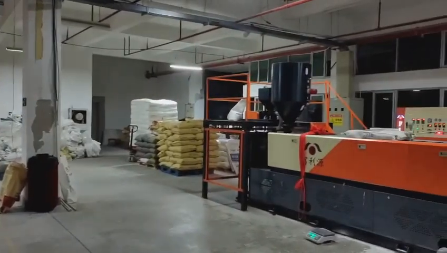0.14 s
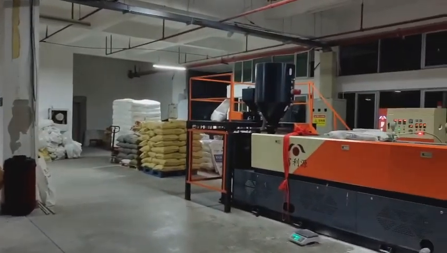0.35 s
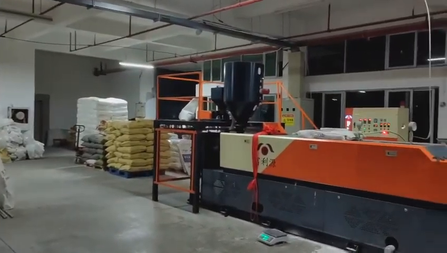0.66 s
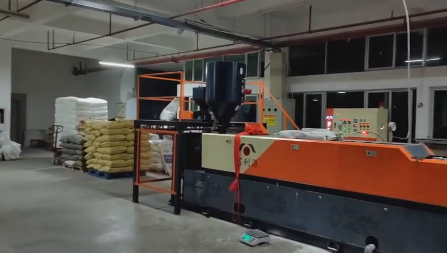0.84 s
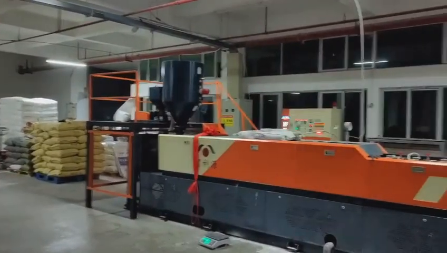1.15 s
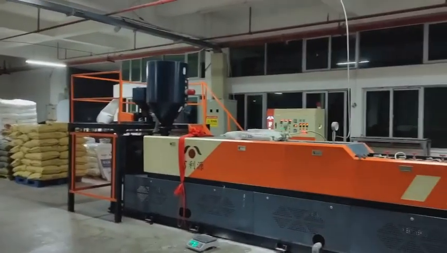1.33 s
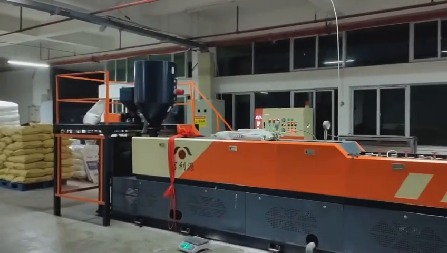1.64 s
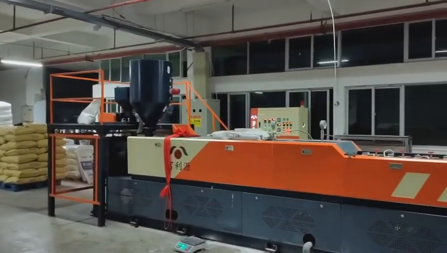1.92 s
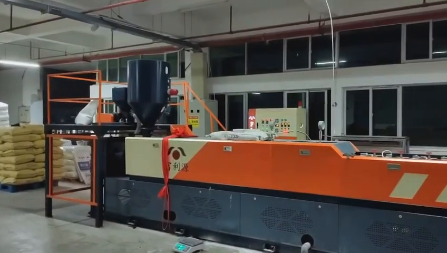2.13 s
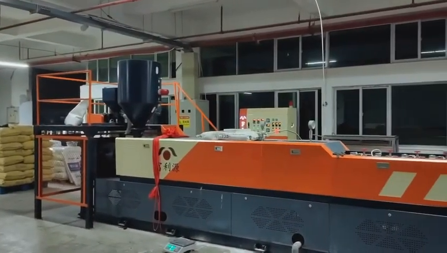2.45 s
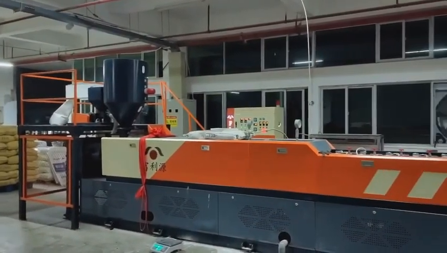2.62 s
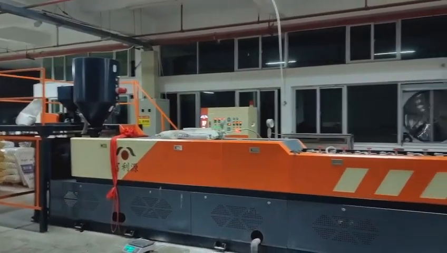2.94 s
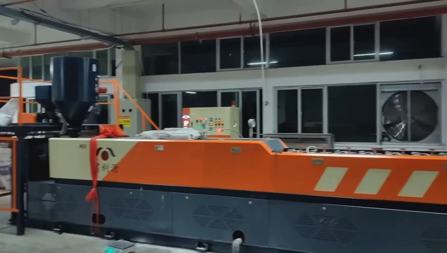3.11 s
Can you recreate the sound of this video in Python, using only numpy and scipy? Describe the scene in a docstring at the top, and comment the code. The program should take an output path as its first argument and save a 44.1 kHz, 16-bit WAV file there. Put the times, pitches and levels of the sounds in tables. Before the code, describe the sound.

Steady extruder drone from start to end, bassy fan roar below and thin motor and gear whines above that swell and fade separately, heard in mono on a handheld phone in a big industrial hall.

```python
"""Plastics extruder in a factory hall

A plastics extruder drones, heard from a phone carried slowly along the hall. The motor drive whines in sines
at its switching harmonics and their sidebands; gears and fan blades add tones, and filtered noise makes low hums.
Level curves make the strong tones swell and fade, as on a walk through the hall's standing waves.
Banded noise makes the roar of fans and hall; low noise makes the rumble of air on the microphone."""
import sys
import numpy as np
from scipy import signal
from scipy.fft import irfft
from scipy.io import wavfile
from scipy.ndimage import uniform_filter1d

SR = 44100
rng = np.random.default_rng(int(sys.argv[2]) if len(sys.argv) > 2 else 0)


def pcm_store(signal):
    """Save signal as 16-bit PCM."""
    levels = np.round(np.clip(np.atleast_2d(signal), -1, 1) * 32767)
    wavfile.write(sys.argv[1], SR, levels.astype(np.int16).T)


N = 144207  # samples

# Drive: switching rate and motor supply frequency
SWITCH_HZ, SUPPLY_HZ = 2000.6, 39.55
# Strong drive tones: switching_multiple, supply_multiple [counts]
STRONG_ORDERS = [(1, -1), (1, 1), (1, 3), (1, 5), (2, -2), (2, 0), (2, 2), (4, 0)]
# Level curves of the strong drive tones, in the same order: start_s, level_db
# Around the switching rate
SWITCH_LOWER_INNER = [(0.0, -42.7), (0.32, -47.6), (0.4, -40.7), (0.84, -45.6), (1.12, -31.3),
                      (1.24, -30.6), (1.56, -46.4), (1.68, -41.7), (1.84, -51.1), (1.96, -44.4),
                      (3.2, -49.1), (3.27, -47.3)]
SWITCH_UPPER_INNER = [(0.0, -44.5), (0.28, -33.5), (0.48, -42), (0.68, -34), (0.84, -36.5), (0.96, -54),
                      (1.08, -38.5), (1.24, -36), (1.4, -57), (1.84, -44.5), (2.36, -46.5), (2.76, -41),
                      (3.16, -71), (3.27, -60.2)]
SWITCH_UPPER_MIDDLE = [(0.0, -47), (0.48, -56), (0.68, -57.6), (0.76, -50), (1.12, -37), (1.68, -55),
                       (2.08, -59), (2.12, -74), (2.76, -46), (3.27, -75)]
SWITCH_UPPER_OUTER = [(0.0, -44), (0.2, -41.5), (0.8, -44), (1.36, -60), (1.48, -36.5), (1.56, -33.5),
                      (1.76, -33.5), (2.12, -67), (2.36, -74), (2.72, -40), (2.96, -40.5), (3.12, -50),
                      (3.27, -46.3)]
# Around twice the switching rate: start_s, level_db
OCTAVE_LOWER = [(0.0, -64), (0.24, -41), (0.44, -44), (0.8, -67), (0.88, -48.5), (1.36, -63), (1.48, -49),
                (1.8, -47.5), (2.12, -76), (2.72, -48), (3.27, -65.2)]
OCTAVE_CENTRE = [(0.0, -56), (0.2, -76), (0.4, -49), (0.64, -64), (1.12, -58), (1.28, -50), (1.72, -44.5),
                 (1.96, -78), (2.48, -70), (3.27, -48)]
OCTAVE_UPPER = [(0.0, -51), (0.2, -55), (0.44, -51), (1.24, -57), (1.4, -45.5), (1.6, -44), (1.72, -56.5),
                (2.2, -46), (2.88, -63), (3.12, -57.2), (3.27, -69.2)]
# At four times the switching rate: start_s, level_db
WHISTLE_LEVEL = [(0.0, -66), (0.2, -49), (0.27, -50), (0.4, -68), (0.7, -64), (0.78, -53), (0.97, -49),
                 (1.05, -68), (1.45, -56), (1.58, -69), (1.66, -49.5), (1.82, -50), (2.0, -66), (2.5, -64),
                 (2.62, -49), (2.78, -49), (2.94, -52), (3.05, -68), (3.27, -66)]
# Weak drive tones: switching_multiple, supply_multiple [counts]
WEAK_ORDERS = [(1, -5), (2, -6), (2, -4), (2, 6), (3, -3), (3, -1), (3, 3), (3, 5), (4, -2), (4, 2)]
# Mean levels of the weak drive tones: level_db
WEAK_LEVELS = [-53.5, -59.5, -63, -79, -67, -68, -71, -69.5, -68.5, -68]

# Tooth-meshing tones: pitch_hz
GEAR_PITCHES = (2748.3, 3133.6, 4867)
# Level curves of the lowest, middle and highest gear tone: start_s, level_db
GEAR_LOWEST = [(0.0, -52), (0.96, -56.4), (1.04, -68), (1.32, -46), (1.52, -66.0), (1.8, -44),
               (2.36, -49.5), (2.68, -42), (3.27, -51)]
GEAR_MIDDLE = [(0.0, -41.5), (0.28, -50.5), (0.4, -42), (0.64, -69), (1.04, -44), (1.2, -68), (1.72, -41.5),
               (2.2, -49.5), (2.64, -43.5), (3.04, -53.5), (3.12, -65.3), (3.27, -49)]
GEAR_HIGHEST = [(0.0, -67), (0.42, -64), (0.45, -53), (0.71, -62), (0.77, -53.5), (1.16, -57), (1.18, -65),
                (2.06, -60), (3.27, -62)]
# Other faint machine tones: pitch_hz
FAINT_PITCHES = [866.5, 990.7, 1060, 1244, 1352, 1370, 1497, 2988, 3370, 7826, 8180, 8789, 8865]
# Mean levels of the faint machine tones: level_db
FAINT_LEVELS = [-49, -50, -57.5, -52, -54, -59, -54.5, -59, -65.5, -64, -71, -67.5, -67]

BLADE_HZ = 579.5  # blade-passing rate
# Level curve of the blade-passing tone: start_s, level_db
BLADE_LEVEL = [(0.0, -45), (0.64, -51), (0.8, -34), (0.92, -48), (1.96, -41.5), (2.08, -33), (2.68, -34.5),
               (2.8, -41.5), (3.12, -31), (3.27, -47)]
# Blurred hums of casing and fans: pitch_hz, half_width_hz, level_db (before fades and swells)
HUM_RESONANCES = [(101.3, 11, -39), (145.6, 5.6, -37.5), (194.1, 3, -37), (232.5, 6.6, -35.5),
                  (368.2, 4.7, -40), (520, 8.5, -45.5), (615, 11, -52.5), (755.7, 10, -46)]

# Spectrum of the fan and hall roar: frequency_hz, relative_level_db (per Hz)
ROAR_SPECTRUM = [(62, -23), (85, -7.5), (105, -5), (160, -9), (228, -0.5), (330, -7.5), (452, -14),
                 (620, -13.5), (802, -21.5), (1100, -22), (1590, -27.5), (2050, -24.5), (2460, -33),
                 (3060, -32.5), (3600, -37), (4100, -34.5), (4600, -40), (5900, -41), (6700, -46),
                 (8000, -39), (8900, -44.5), (11100, -50.5), (12400, -53), (13800, -62)]
# Surges of the bass: start_s, level_db (the hums use only the departures from the mean)
BASS_SURGES = [(0.0, -29), (0.05, -24), (0.31, -21), (0.4, -27), (0.84, -23), (0.87, -32), (0.95, -22),
               (1.19, -29), (1.24, -22), (1.38, -26.5), (1.44, -21), (1.53, -23.5), (1.81, -26),
               (1.87, -32.5), (1.95, -21.5), (2.04, -23), (2.09, -27.5), (2.36, -21), (2.42, -29),
               (2.44, -24.5), (3.02, -20), (3.15, -24), (3.2, -19.5), (3.27, -22)]
# Swells of the roar, each used about its mean: start_s, deep_db, middle_db, treble_db
ROAR_SWELLS = [(0.0, -52, -28, -50.5), (0.11, -34.5, -29.5, -50.5), (0.4, -38.5, -26, -49.5),
               (0.53, -39.5, -27.5, -50.5), (2.36, -28, -26.5, -48.5), (2.42, -38.5, -25.5, -49),
               (2.84, -30, -27.5, -49), (2.85, -44, -27.5, -48), (3.11, -35.5, -25, -50),
               (3.27, -39, -33, -50)]
# Where the deep, bass, middle and treble swells apply in full: frequency_hz
SWELL_CENTRES = (100, 240, 800, 5000)
# Band layout, narrower in the treble: frequency_hz, band_number
ROAR_BANDS = [(40, 0), (2000, 17), (14500, 82)]

# Air on the microphone: start_s, level_db
RUMBLE_LEVEL = [(0, -46), (0.06, -42), (1.4, -42), (1.9, -37), (2.4, -37.5), (2.75, -37), (2.8, -56),
                (3.27, -60)]

FADE_DB, FADE_PER_S = 3, 4.5  # spread and rate of the random fades of weak tones and hums
FLUTTER_DB, PITCH_WAVER = 1.2, .0003  # spreads within every tone; waver as a fraction of pitch
SHAFT_HZ, SHAFT_DRIFT_RAD = SUPPLY_HZ / 2, .6  # shaft rate and spread of its phase wander
DRIVE_THROB_PER_MULTIPLE, GEAR_THROB = .07, .28  # depths 0-1; the drive's grows with switching multiple
FLICKER_DB, TREBLE_FLICKER_DB, FLICKER_PER_S = 1.41, 3.5, 18  # spreads up to the middle, in the treble; rate
RUMBLE_LOW_HZ, RUMBLE_HIGH_HZ = 34.7, 55.3
TOP_HZ = 14030  # upper limit of the phone


def drive():
    """Pulse-width modulation: switching harmonics carry sidebands at multiples of the supply frequency."""
    levels = [SWITCH_LOWER_INNER, SWITCH_UPPER_INNER, SWITCH_UPPER_MIDDLE, SWITCH_UPPER_OUTER,
              OCTAVE_LOWER, OCTAVE_CENTRE, OCTAVE_UPPER, WHISTLE_LEVEL]
    out = 0
    for (switching, supply), table in zip(STRONG_ORDERS, levels):
        hz = switching * SWITCH_HZ + supply * SUPPLY_HZ
        out = out + tone(hz, curve(table), DRIVE_THROB_PER_MULTIPLE * switching)
    for (switching, supply), db in zip(WEAK_ORDERS, WEAK_LEVELS):
        hz = switching * SWITCH_HZ + supply * SUPPLY_HZ
        out = out + tone(hz, db + FADE_DB * walk(FADE_PER_S))
    return out


def gears():
    """Periodic tooth contact: meshing tones, with fainter machine tones, throb at the shaft rate."""
    out = 0
    for hz, table in zip(GEAR_PITCHES, (GEAR_LOWEST, GEAR_MIDDLE, GEAR_HIGHEST)):
        out = out + tone(hz, curve(table), GEAR_THROB)
    for hz, db in zip(FAINT_PITCHES, FAINT_LEVELS):
        out = out + tone(hz, db + FADE_DB * walk(FADE_PER_S), GEAR_THROB)
    return out


def blades():
    """Blade passing: a sine at the blade rate."""
    return tone(BLADE_HZ, curve(BLADE_LEVEL))


def hums():
    """Resonance under random excitation: casing and fan hums fade alone and swell with the bass."""
    out = 0
    for hz, half_width_hz, db in HUM_RESONANCES:
        out = out + hum(hz, half_width_hz, db) * undb(FADE_DB * walk(FADE_PER_S))
    bass_db = curve(BASS_SURGES)
    return out * undb(bass_db - bass_db.mean())


def roar():
    """Broadband noise: overlapping bands follow shared slow swells and flicker independently."""
    log_hz = np.log2(np.maximum(np.arange(N // 2 + 1) * SR / N, 1))
    spectrum = np.array(ROAR_SPECTRUM)
    colour = undb(np.interp(log_hz, np.log2(spectrum[:, 0]), spectrum[:, 1], left=-60))
    # unit RMS below 400 Hz, so that the bass curve sets the level
    colour = colour / shaped(colour * (log_hz < np.log2(400))).std()

    swells = np.array([curve(ROAR_SWELLS), curve(BASS_SURGES),
                       curve(ROAR_SWELLS, col=2), curve(ROAR_SWELLS, col=3)])
    # every swell curve takes the mean level of the bass
    swells += swells[1].mean() - swells.mean(axis=1, keepdims=True)

    layout = np.array(ROAR_BANDS)
    edges, numbers = np.log2(layout[:, 0]), layout[:, 1]
    band_position = np.interp(log_hz, edges, numbers)
    out = 0
    for band in range(1, numbers[-1] + 1):
        # cosine windows: neighbouring bands cross over at constant power
        window = np.cos(np.pi / 2 * np.clip(band_position - band, -1, 1))
        centre = np.interp(band, numbers, edges)
        place = np.interp(centre, np.log2(SWELL_CENTRES), range(4))
        # blend the two nearest swell curves
        db = sum(max(1 - abs(place - k), 0) * swells[k] for k in range(4))
        flicker_db = np.interp(place, range(2, 4), (FLICKER_DB, TREBLE_FLICKER_DB))
        gain = undb(db + flicker_db * walk(FLICKER_PER_S))
        out = out + gain * shaped(colour * window)
    return out


def rumble():
    """Turbulent pressure: moving air on the microphone is low band-limited noise."""
    f = np.arange(N // 2 + 1) * SR / N + 1  # 1 Hz offset avoids division by zero
    low_cut = 1 + (RUMBLE_LOW_HZ / f) ** 12
    high_cut = 1 + (f / RUMBLE_HIGH_HZ) ** 4
    air = shaped(1 / np.sqrt(low_cut * high_cut))
    return air / air.std() * undb(curve(RUMBLE_LEVEL))


def tone(hz, db, throb=0.):
    """Modulated sine: echoes shifting around a moving listener waver it, and a shaft turn throbs it."""
    wavering_hz = hz * (1 + PITCH_WAVER * walk(12))
    phase = 2 * np.pi * (np.cumsum(wavering_hz) / SR + rng.random())
    turn = 2 * np.pi * (SHAFT_HZ * np.arange(N) / SR + rng.random()) + SHAFT_DRIFT_RAD * walk(5)
    rms = undb(db + FLUTTER_DB * walk(14))
    return np.sqrt(2) * rms * (1 + throb * np.cos(turn)) * np.sin(phase)


def hum(hz, half_width_hz, db):
    """Narrow-band resonance: noise rings around one pitch, at half amplitude one half-width away."""
    f = np.arange(N // 2 + 1) * SR / N
    ring = shaped(1 / (1 + ((f - hz) / half_width_hz) ** 2))
    return ring / ring.std() * undb(db)


def shaped(gain):
    """Spectral shaping: Gaussian noise takes the given gain in each frequency bin."""
    bins = rng.standard_normal(len(gain)) + 1j * rng.standard_normal(len(gain))
    return irfft(gain * bins, N)


def walk(rate):
    """Smoothed random process: values held 1 / rate s are averaged twice; spread near 1."""
    k = int(SR / rate)
    held = np.repeat(rng.standard_normal(N // k + 1), k)
    return 1.34 * uniform_filter1d(uniform_filter1d(held, k), k)[:N]


def curve(table, col=1):
    """Linear interpolation: a table column is joined by straight lines in time."""
    rows = np.array(table)
    return np.interp(np.arange(N) / SR, rows[:, 0], rows[:, col])


def undb(db):
    """Logarithmic level: decibels become an amplitude gain."""
    return 10 ** (np.asarray(db) / 20)


def scene():
    """Superposition: all sources add in one channel."""
    return (drive() + gears() + blades() + hums() + roar() + rumble())[None, :]


def record(dry):
    """Band limitation: the phone cuts the top with a steep elliptic low-pass."""
    low_pass = signal.ellip(14, .3, 80, TOP_HZ, fs=SR, output="sos")  # ripple and stopband in dB
    return signal.sosfilt(low_pass, dry)


dry = scene()
out = record(dry)
pcm_store(out)
```